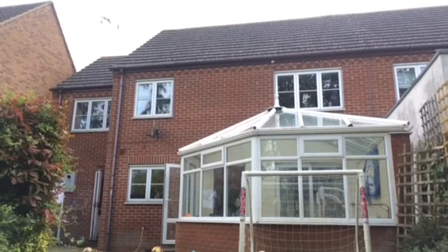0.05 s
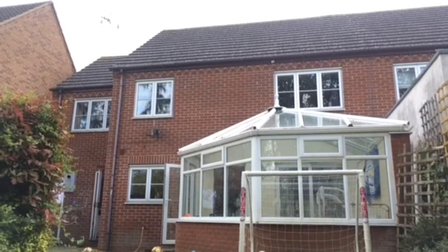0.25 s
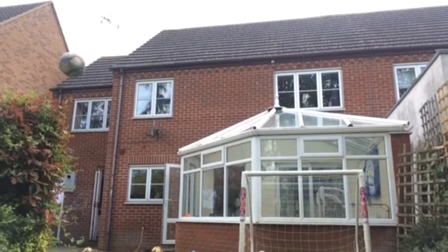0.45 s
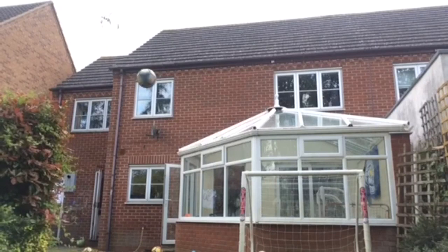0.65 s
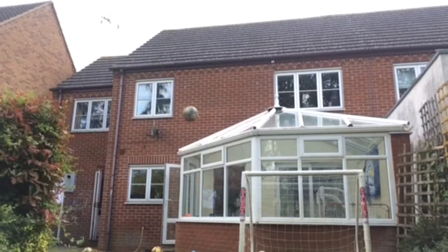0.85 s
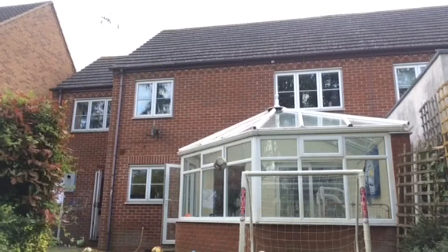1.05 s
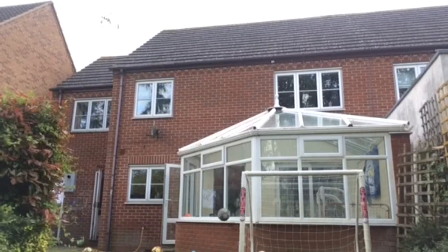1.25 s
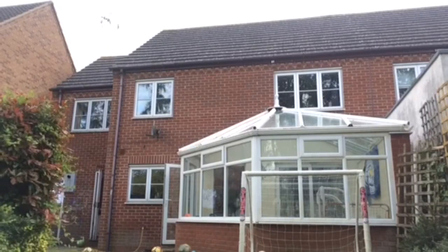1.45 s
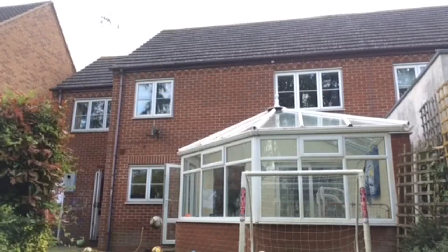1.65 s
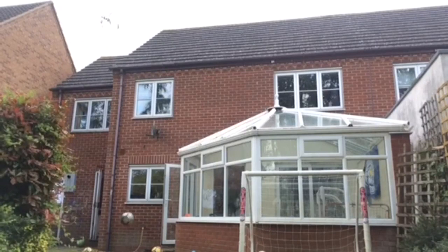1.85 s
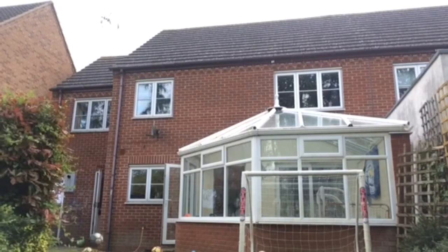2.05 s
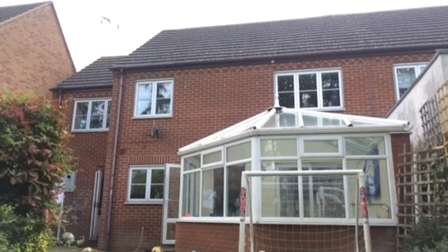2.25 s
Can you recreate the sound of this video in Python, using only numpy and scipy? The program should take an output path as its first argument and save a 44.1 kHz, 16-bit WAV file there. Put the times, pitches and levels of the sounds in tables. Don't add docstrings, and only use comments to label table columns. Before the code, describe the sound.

A football kicked hard close by, then slamming into a rattling glazed frame and bouncing on grass

```python
import sys
import numpy as np
from scipy import signal
from scipy.fft import rfft, irfft
from scipy.io import wavfile
from scipy.ndimage import uniform_filter1d

SR = 44100
rng = np.random.default_rng(int(sys.argv[2]) if len(sys.argv) > 2 else 0)


def dump_mix(stems):
    frames = np.atleast_2d(stems).T
    limited = np.clip(frames, -1, 1)
    pcm = np.round(limited * 32767).astype(np.int16)
    wavfile.write(sys.argv[1], SR, pcm)


def volts_from_db(level):
    exponent = np.asarray(level, float) / 20
    return 10 ** exponent


N = 101429
T = np.arange(N) / SR


def unit(x):
    return x / np.sqrt(np.mean(x ** 2))


def bands(colour):
    hz = np.maximum(np.arange(N // 2 + 1) * SR / N, 1)
    at, db = np.array(colour, float).T
    whole = rfft(rng.standard_normal(N)) * volts_from_db(np.interp(np.log(hz), np.log(at), db))
    whole = whole / np.sqrt(np.mean(irfft(whole, N) ** 2))
    slices = []
    for centre in 20 * 2 ** np.arange(0, 10.1, 0.5):
        weight = np.clip(1 - 2 * abs(np.log2(hz / centre)), 0, 1)
        slices.append((centre, irfft(whole * weight, N)))
    return slices


def fade(start, attack, t60):
    s = np.maximum(T - start, 0)
    return (1 - np.exp(-s / attack)) * volts_from_db(-60 * s / t60)


def hump(start, length, rise=1):
    return np.sin(np.pi * np.clip((T - start) / length, 0, 1) ** rise)


def ring(x, modes):
    out = 0
    for hz, db, t60 in modes:
        pole = np.exp(2j * np.pi * hz / SR - np.log(1000) / (t60 * SR))
        out = out + volts_from_db(db) * signal.lfilter([1], [1, -pole], x).imag
    return out


def walk(rate_hz):
    k = int(SR / rate_hz)
    steps = np.repeat(rng.standard_normal(N // k + 1), k)
    return unit(uniform_filter1d(uniform_filter1d(steps, k), k)[:N])


def click(colour):
    at, db = np.array(colour, float).T
    log_gain = np.interp(np.log(np.arange(1, 514) * SR / 1024), np.log(at), db) * np.log(10) / 20
    fold = np.r_[1, 2 * np.ones(511), np.zeros(512)]
    pulse = irfft(np.exp(rfft(irfft(log_gain) * fold)))
    return -pulse / abs(pulse).max()


def contacts(rows, colour, attack_s=0.0002):
    # f/Hz, level/dB, t60/s
    air_modes = [(437.7, -6, 0.14), (520, -5.5, 0.068), (690, -5, 0.14), (777, -8.5, 0.1), (154, -10, .25),
                 (291.8, -5.5, .17), (1124, -4.5, 0.089), (1228, -14.5, 0.14), (1585, -14, 0.093),
                 (1797, -16, 0.07), (2073, -19.5, 0.041)]
    noise = sum(b for _, b in bands(colour))
    scrape = rng.standard_normal(N)
    crack, push, taps = np.zeros(N), np.zeros(N), np.zeros(N)
    for s, crack_db, t60, air_db, click_db in rows:
        shape = fade(s, attack_s, t60)
        crack += volts_from_db(crack_db) * shape
        push += volts_from_db(air_db - 15.5) * shape
        taps[int(s * SR)] = volts_from_db(click_db)
    return crack * noise + ring(push * scrape, air_modes) + signal.fftconvolve(taps, click(colour))[:N]


def brushes(rows):
    grain_db = 1.8
    out = 0
    for s, d, db, hz, width in rows:
        edge, top = min(width, 2 * hz), hz + width / 2
        colour = [(hz / 2 - edge / 4.2, -40), (hz - edge / 2.2, -3), (hz, 0), (top, -3), (1.3 * top, -45)]
        noise = sum(b for _, b in bands(colour)[4:])
        out = out + volts_from_db(db + grain_db * walk(300)) * hump(s, d, 0.6) ** 2 * noise
    return out


def tails(rows, colour):
    out = 0
    for hz, b in bands(colour):
        height = np.log(hz / 100) / np.log(100)
        for s, db, rise, low, high in rows:
            out = out + b * volts_from_db(db) * fade(s, rise, low * (high / low) ** height)
    return out


def thuds():
    # t/s, level/dB, f/Hz, length/s
    boot_thud = (.2259, -2.6, 95, .032)
    # t/s, level/dB, f/Hz, length/s
    skin_thuds = [(.2278, -12.5, 183.7, 0.012), (0.2357, -12, 52.4, 0.032), (0.279, -22, 82.5, 0.035),
                  (0.342, -33, 95.5, 0.054), (0.247, -21, 690, .006), (.252, -28, 158, 0.038),
                  (1.312, -16.5, 87, 0.012), (1.332, -20.5, 83, 0.018), (1.3538, -17.5, 78, 0.024),
                  (1.3605, -25, 190, 0.0068), (1.379, -20.5, 86, 0.025), (1.43, -21, 94.5, 0.019),
                  (1.451, -28, 90, 0.046), (1.549, -18, 75, 0.023), (1.588, -24, 89, 0.025),
                  (2.257, -32, 114, 0.01), (2.2751, -26, 71.5, 0.033)]
    out = 0
    for s, db, hz, d in [boot_thud, *skin_thuds]:
        swell = abs(hump(s, d, 0.82)) ** 1.5
        out = out - volts_from_db(db) * swell * np.sin(2 * np.pi * hz * (T - s))
    return out


def kick():
    # t/s, crack/dB, crack t60/s, air ring/dB, click/dB
    hits = [
        (.2302, -15, 0.015, -26, -7),
    ]
    # f/Hz, level/dB
    crack_colour = [(300, -13.5), (700, 3.5), (1100, -5), (1600, -5.5), (2300, -8), (3200, -31),
                    (4500, -41.5), (7500, -26.5), (11000, -26.5), (16000, -42.5)]
    # t/s, length/s, level/dB, centre f/Hz, width/Hz
    crackle = [
        (0.229, .004, -33.5, 10000, 7000),
        (0.2314, .004, -35, 10000, 7000),
        (.238, .006, -47.5, 6950, 8000),
        (0.242, .04, -52, 6500, 6500),
        (0.255, 0.15, -49.5, 694, 700),
    ]
    return contacts(hits, crack_colour) + brushes(crackle)


def wall_slap():
    # t/s, crack/dB, crack t60/s, air ring/dB, click/dB
    returns = [
        (.2468, -27, .025, -36, -17),
    ]
    # f/Hz, level/dB
    slap_colour = [(180, -20), (400, -2), (750, 0), (1100, -14), (2200, -21), (3300, -40), (9500, -46),
                   (16000, -70)]
    return contacts(returns, slap_colour)


def slam():
    # t/s, crack/dB, crack t60/s, air ring/dB, click/dB
    hits = [
        (1.3165, -23, 0.0092, -46, -16.5),
    ]
    # f/Hz, level/dB
    crack_colour = [(250, 0), (600, -6), (1000, -5), (1900, -18), (2700, -13), (3800, -15), (5200, -29),
                    (7300, -14), (9800, -34), (16000, -50)]
    return contacts(hits, crack_colour)


def bounces():
    # t/s, crack/dB, crack t60/s, air ring/dB, click/dB
    hits = [
        (1.55, -35, .07, -47, -47),
        (2.256, -44.5, 0.054, -51, -68),
    ]
    # f/Hz, level/dB
    crack_colour = [(300, -0.5), (800, -9), (1150, -6), (1550, -6), (1950, -8), (2250, -30), (5000, -34),
                    (16000, -52)]
    return contacts(hits, crack_colour, attack_s=0.004)


def frame():
    # t/s, level/dB
    shaking = [
        (1.317, -46),
        (1.337, -46),
        (1.35, -47.5),
        (1.375, -45),
        (1.41, -47),
        (1.468, -55),
        (1.55, -67),
        (1.64, -81),
    ]
    # f/Hz, level/dB
    chatter_colour = [(150, -49.5), (250, -7.5), (336, -5.5), (938, -14.5), (1240, -13), (2160, -23),
                      (4820, -26.5), (6590, -26), (16000, -57)]
    # f/Hz, level/dB, t60/s
    panes = [(54, -3, 0.31), (135, -4, 0.067), (203.3, -0.5, 0.15), (335, -15.5, 0.35), (404.4, -17, 0.25),
             (523, -18.5, .2)]
    # f/Hz, level/dB, t60/s
    trims = [(1784, 2, 0.0116), (3254, 3.5, 0.0079), (4763, 3, 0.0087), (6300, -1, 0.0058)]
    # t/s, length/s, level/dB, centre f/Hz, width/Hz
    snaps = [
        (1.345, .008, -44, 5800, 2000),
        (1.344, .014, -44, 1750, 700),
        (1.319, .006, -44, 7600, 1800),
        (1.3195, .006, -44, 2700, 900),
        (1.3205, .008, -35, 1000, 500),
        (1.341, .003, -51, 6000, 7000),
        (1.361, .012, -42, 1600, 900),
        (1.434, .008, -50, 3000, 800),
        (1.36, .07, -53, 5600, 3600),
    ]
    knocks_per_s, knock_spread_db, knock_decay_s = 14000, 1.5, 0.0017
    patchy_db, dulling_db_s, linger_db_s = 1.5, 25, 16
    at, db = np.array(shaking).T
    shake = volts_from_db(np.interp(T, at, db, left=-120, right=-120))
    knocks = (rng.random(N) < knocks_per_s / SR) * volts_from_db(knock_spread_db * rng.exponential(size=N))
    grain = unit(signal.lfilter([1], [1, -np.exp(-1 / (knock_decay_s * SR))], knocks))
    hum = ring(rng.standard_normal(N) * hump(at[0], 0.0733, 0.31), panes)
    linger = volts_from_db(-8 + linger_db_s * np.clip(T - at[0], 0, 0.25))
    buzz = linger * unit(ring(rng.standard_normal(N), trims)) * volts_from_db(patchy_db * walk(59.5))
    age_s = np.clip(T - at[0], 0, 0.3)
    chatter = 0
    for hz, b in bands(chatter_colour):
        dulling_db = dulling_db_s * age_s * max(np.log2(hz / 4000), 0)
        chatter = chatter + b * volts_from_db(patchy_db * walk(70) - dulling_db)
    return shake * grain * (buzz + volts_from_db(5) * chatter) + volts_from_db(-40.5) * unit(hum) + brushes(snaps)


def garden():
    # t/s, level/dB, attack/s, bass t60/s, treble t60/s
    kick_tail = [
        (.231, -25, 0.00093, 0.27, 0.19),
    ]
    # f/Hz, level/dB
    kick_colour = [(90, -20.5), (150, 2.5), (310, -5), (520, -3.5), (760, -12), (1330, -26), (2990, -32.5),
                   (8280, -39.5), (16000, -52)]
    # t/s, level/dB, attack/s, bass t60/s, treble t60/s
    bounce_tails = [
        (1.555, -32, 0.0033, 0.43, 0.31),
        (2.26, -29, 0.0076, 0.14, 0.18),
    ]
    # f/Hz, level/dB
    bounce_colour = [(35, -5.5), (60, -3.5), (115, -7), (256, -17.5), (698, -30), (968, -42), (1200, -43.5),
                     (7230, -53), (16000, -76.5)]
    grain_db = 2.5
    return volts_from_db(grain_db * walk(198.6)) * tails(kick_tail, kick_colour) + tails(bounce_tails, bounce_colour)


def scuffs():
    # t/s, length/s, level/dB, centre f/Hz, width/Hz
    steps = [(0.16, 0.22, -67.5, 1500, 3000), (0.652, 0.079, -68.5, 2180, 2800),
             (.67, 0.059, -76, 9500, 8000), (0.906, 0.25, -75.5, 3200, 6900),
             (1.3, 0.012, -74.5, 9000, 9000), (1.178, 0.44, -57, 460, 850), (1.21, 0.32, -68, 1140, 1200),
             (1.4, 0.07, -59, 410, 590), (2.1, 0.055, -76, 3000, 3560), (1.99, 0.042, -60, 1630, 2200),
             (1.99, 0.092, -62.5, 10700, 8800), (1.998, .012, -67, 5500, 5000),
             (2.015, .008, -63, 10500, 5000), (1.552, .15, -57, 650, 500), (1.55, .07, -62, 1400, 1000),
             (2.2, 0.17, -61.5, 460, 630), (2.175, 0.054, -64, 500, 800), (1.88, .12, -75, 9000, 8000)]
    return brushes(steps)


def bird():
    # t/s, length/s, level/dB, f/Hz
    chirps = [
        (0.348, 0.093, -74.5, 4660),
        (0.394, 0.095, -70, 3600),
        (0.452, 0.034, -77, 2980),
        (.485, 0.037, -74, 3610),
        (0.532, 0.046, -71, 3570),
        (0.568, .03, -78, 3680),
        (1.796, 0.069, -71, 4020),
        (1.844, 0.049, -67.5, 3600),
    ]
    warble, blur_hz = 0.03, 350
    cycles_per_hz = np.cumsum(1 + warble * walk(150)) / SR
    blur = walk(2 * blur_hz)
    notes = 0
    for s, d, db, hz in chirps:
        notes = notes + volts_from_db(db - 0.5) * hump(s, d, 0.88) * np.sin(2 * np.pi * hz * cycles_per_hz)
    return blur * notes


def town():
    # f/Hz, level/dB
    rumble_colour = [(15, -60), (25, -10.5), (86, 0.5), (125, -9), (206, -15.5), (244, -18.5), (422, -26.5),
                     (897, -42.5), (1500, -43.5), (1950, -75), (3300, -120)]
    # f/Hz, level/dB
    air_colour = [(880, -17), (1500, -6), (1910, -5), (2080, -7.5), (3100, -6.5), (3500, -7), (10400, -14),
                  (14500, -21.5), (16200, -61.5)]
    # t/s, level/dB
    breeze = [
        (0, 2),
        (.35, -2),
        (.6, -1),
        (.95, 1.5),
        (1.25, 0.5),
        (1.7, 3),
        (1.9, 4),
        (2.3, 1.5),
    ]
    breeze_db = np.interp(T, *np.array(breeze).T)
    rumble = sum(b * volts_from_db(2 * walk(7.7)) for _, b in bands(rumble_colour))
    air = sum(b * volts_from_db(breeze_db + 1.4 * walk(5.66)) for _, b in bands(air_colour))
    return volts_from_db(-45) * rumble + volts_from_db(-72.5) * air


def scene():
    ball = thuds() + kick() + wall_slap() + slam() + bounces()
    return (ball + frame() + garden() + scuffs() + bird() + town())[None]


def low_pass(x):
    return signal.sosfilt(signal.butter(12, 16370, fs=SR, output="sos"), x)


def record(dry):
    low_cut = signal.butter(2, 38, "high", fs=SR, output="sos")
    top_cut = signal.butter(8, 16000, fs=SR, output="sos")
    mix = signal.sosfiltfilt(np.vstack([low_cut, top_cut]), dry)
    return low_pass(mix)


dry = scene()
out = record(dry)
dump_mix(out)
```